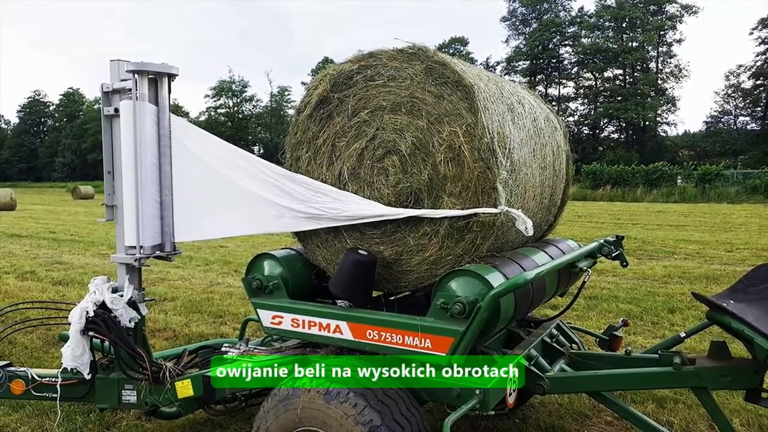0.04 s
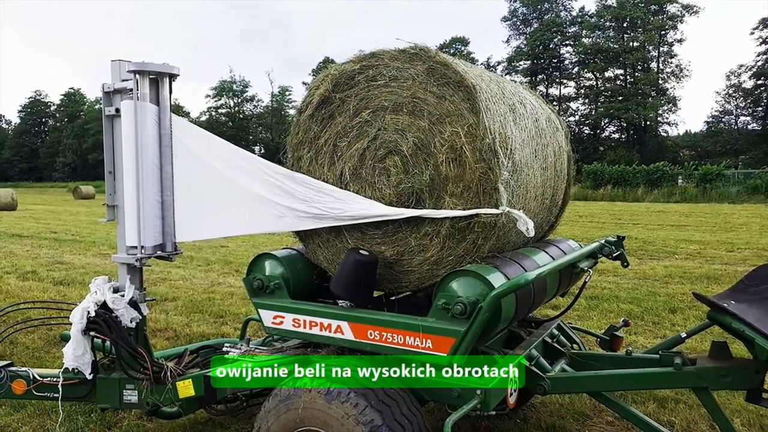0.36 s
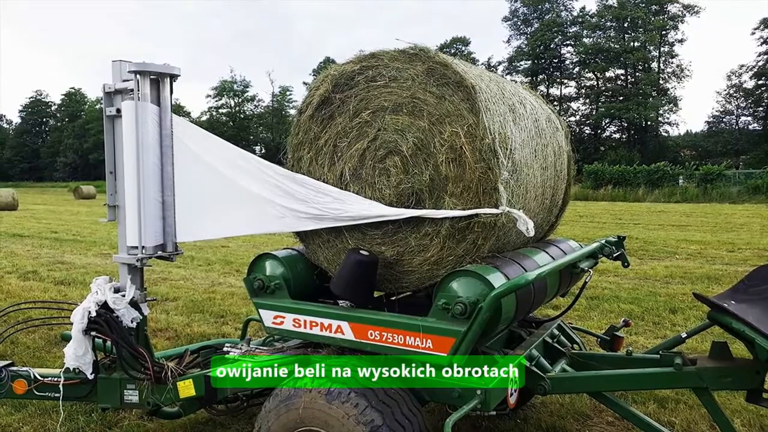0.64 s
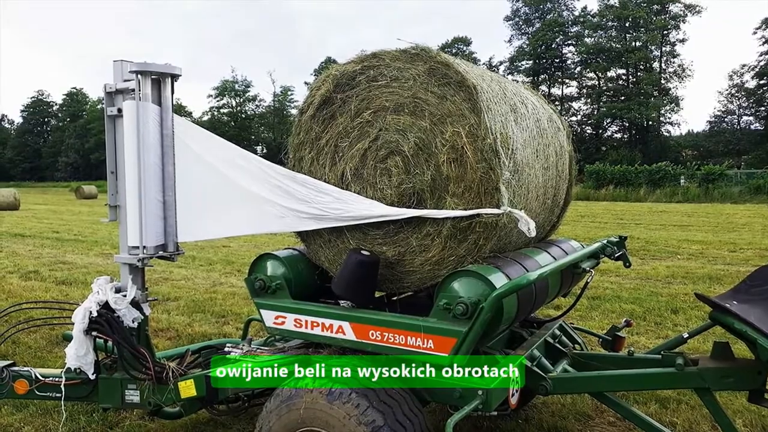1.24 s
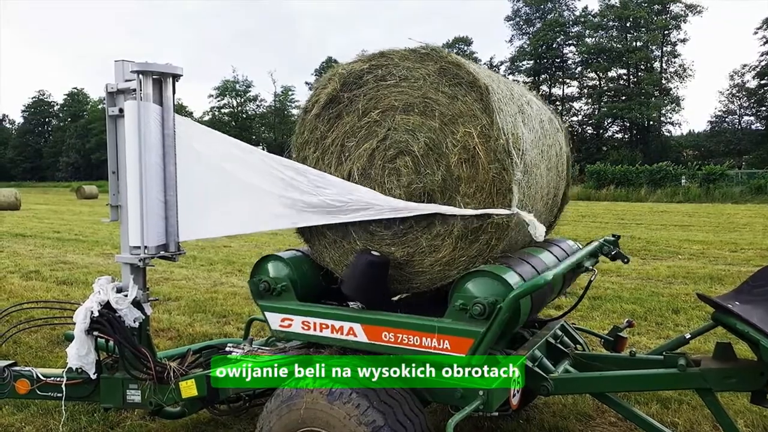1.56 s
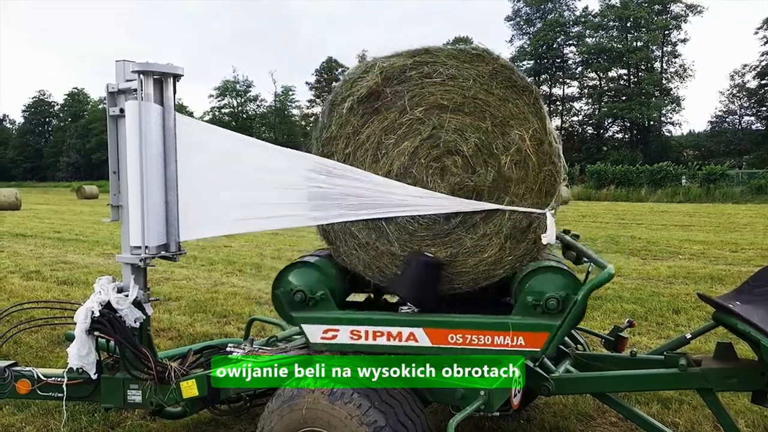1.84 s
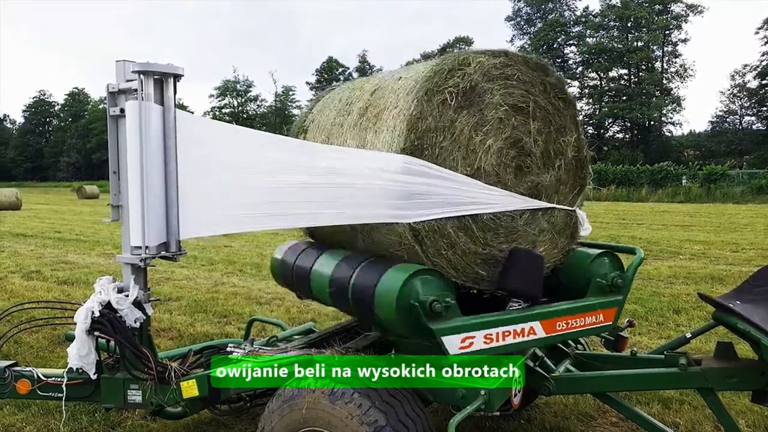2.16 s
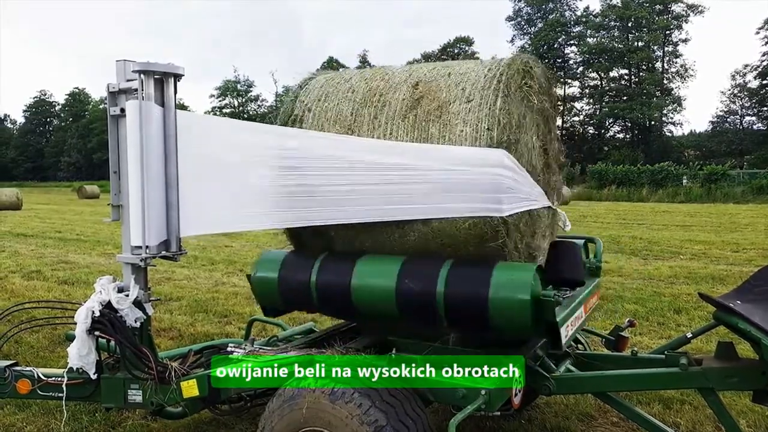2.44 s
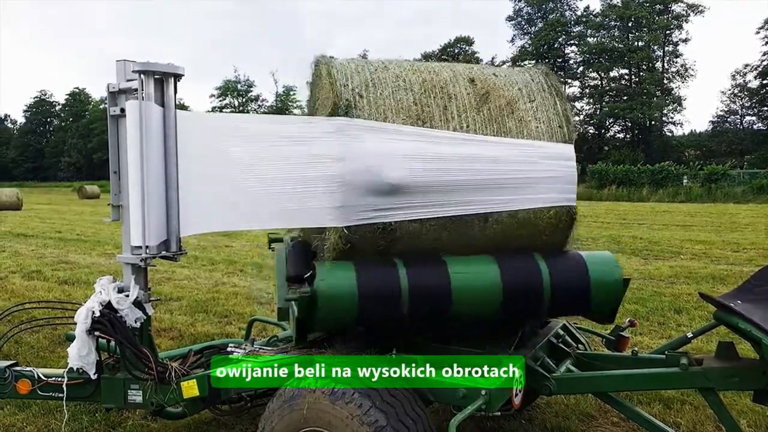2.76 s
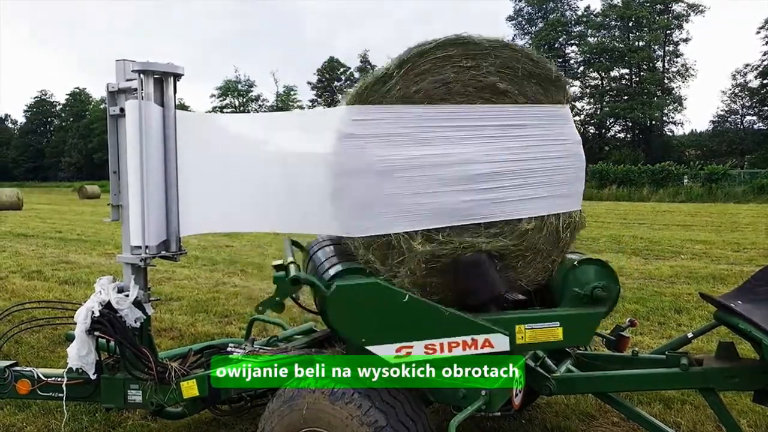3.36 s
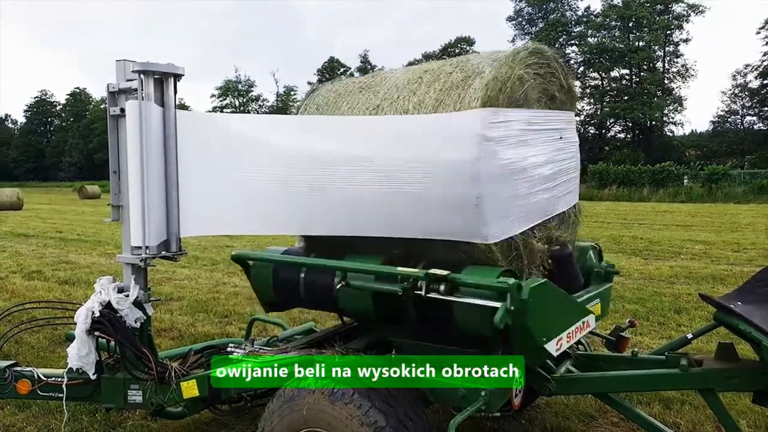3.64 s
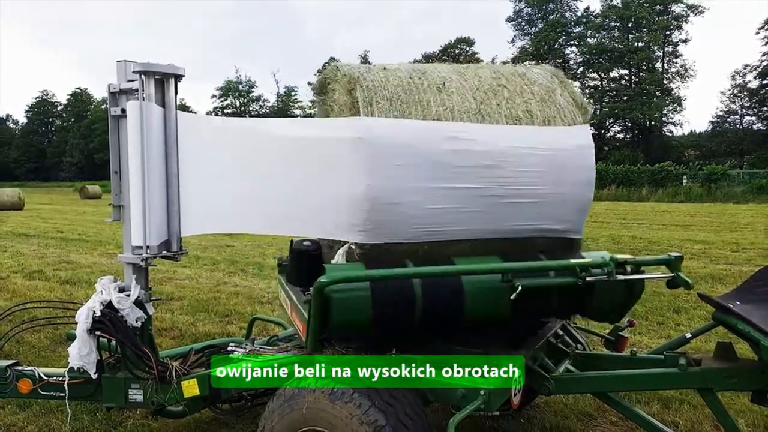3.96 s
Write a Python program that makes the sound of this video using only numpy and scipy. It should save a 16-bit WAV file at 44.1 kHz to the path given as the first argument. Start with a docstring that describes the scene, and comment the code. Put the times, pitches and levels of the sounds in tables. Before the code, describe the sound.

A diesel bale wrapper idles, clacks, then whirs as plastic film peels with a crackle.

```python
"""Open field: a tractor's four-cylinder diesel idles beside a bale wrapper, its frame knocking dully.
A hydraulic valve clacks open, oil hisses, and the engine sags under the load, then revs up.
The turntable rumbles and whirs, its steel singing as it rubs; the bale swings round with a swish.
Stretch film peels off its roll in tiny snaps: a crackling hiss with short, high zips."""
import sys
import numpy as np
from scipy.fft import rfft, irfft, next_fast_len
from scipy.io import wavfile
from scipy.ndimage import map_coordinates

SR = 44100
rng = np.random.default_rng(int(sys.argv[2]) if len(sys.argv) > 2 else 0)


def inscribe(sig):
    """Save sig as 16-bit PCM at rate SR to the path in sys.argv[1].

    A 1-D sig is mono; a 2-D sig holds one channel per row.
    Samples are clipped to [-1, 1] before scaling.
    """
    pcm = np.round(np.clip(np.atleast_2d(sig).T, -1, 1) * 32767)
    wavfile.write(sys.argv[1], SR, pcm.astype(np.int16))


N = 176400

# engine speed (time [s], firing rate [Hz])
FIRING_HZ = [(0, 30), (1.5, 30), (1.75, 27.7), (2.09, 28), (2.51, 31.3), (2.75, 34), (2.92, 37.7),
             (3.03, 39.5), (3.5, 40), (3.71, 41.1), (3.85, 42.7), (4, 46)]
# exhaust partials (multiple of the four-firing cycle, idle [dB], working [dB], unevenness [dB])
EXHAUST_ORDERS = [(4, -44.5, -32, 2), (5, -58, -54, -2), (7, -46, -40.5, 2.5), (8, -37, -33.5, 2.2),
                  (9, -48.5, -46, 1.5), (10, -46, -44.5, 0.5), (11, -45, -44, 1.5), (12, -38.5, -32.5, 1.4),
                  (13, -42, -42, 2), (16, -37.5, -42.5, 1.5), (20, -41.5, -48, 1), (23, -47.5, -43, 1),
                  (28, -50, -48.5, 2), (29, -49.5, -58, 1)]

# envelopes (time [s], level [dB])
EXHAUST_DB = [(0, 1.5), (1.0, 2.5), (1.35, -0.5), (1.8, 4), (2.5, 1.5), (2.75, 5.5), (2.92, 7), (3.1, 2),
              (3.45, 2), (3.7, -0.5), (4, -4.5)]
BLOCK_BOOM_DB = [(0, -41), (1.5, -38.5), (2.4, -38), (3.0, -36), (4, -39)]
DIESEL_KNOCK_DB = [(0, -45), (.25, -45), (.7, -47), (1.45, -46.5), (1.8, -45), (2.5, -45), (3.0, -42.5),
                   (4, -45)]
TABLE_RUMBLE_DB = [(0, -43), (1.55, -52), (1.8, -44), (2.4, -42.5), (2.85, -36), (3.2, -35.5), (3.62, -32),
                   (3.76, -33.5), (3.88, -31.5), (4, -31)]
CHASSIS_SHUDDER_DB = [(0, -42), (.3, -37), (.5, -41.5), (.8, -35.5), (1.3, -39.5), (1.55, -40), (1.8, -44),
                      (2.1, -43), (2.3, -42), (2.6, -35.5), (2.9, -39), (3.15, -41), (3.7, -38),
                      (3.88, -33), (4, -22)]
DRIVE_WHIR_DB = [(0, -100), (2.3, -65), (2.85, -46), (3.25, -47), (3.48, -50), (3.55, -44), (3.6, -41.5),
                 (3.65, -42), (3.72, -49), (4, -50)]
STEEL_RUB_DB = [(0, -120), (2.1, -85), (2.7, -70), (2.85, -56), (3.1, -57), (3.3, -60), (3.49, -55),
                (3.55, -44), (3.6, -48), (3.65, -41.5), (3.72, -59), (4, -59)]
FILM_PEEL_DB = [(0, -110), (1.7, -73), (2.1, -60), (2.2, -53), (2.35, -56), (2.47, -46.5), (2.6, -48),
                (2.85, -43.5), (3.25, -43.5), (3.6, -41.5), (3.77, -43.5), (4, -45)]
OIL_HISS_DB = [(0, -79), (.1, -71), (.13, -62), (.22, -63), (.33, -87), (1.55, -74), (1.59, -59.5),
               (1.8, -58.5), (2.0, -50), (2.2, -51), (2.45, -57.5), (2.8, -52.5), (4, -46.5)]

# spectra (frequency [Hz], left [dB], right [dB])
BLOCK_BOOM_EQ = [(20, -100, -122), (48.6, -80, -77), (118, -56, -51.5), (168, -57.5, -54), (221, -54, -54),
                 (390, -68.5, -63.5), (500, -62.5, -63.5), (608, -62, -58), (773, -73, -69),
                 (1620, -105, -105), (4000, -150, -150)]
DIESEL_KNOCK_EQ = [(99, -110, -110), (520, -75, -89.5), (970, -84, -74.5), (1110, -78.5, -74.5),
                   (1760, -82.5, -79), (2150, -93, -85), (3080, -98, -88.5), (4760, -102, -98),
                   (5300, -119, -107), (6700, -122, -106), (7800, -123, -119), (8950, -114, -112),
                   (9800, -117, -110), (12300, -127, -125), (14900, -141, -141)]
TABLE_RUMBLE_EQ = [(20, -77, -101), (48.8, -61, -68.5), (153, -63, -60.5), (208.5, -50.5, -49.5),
                   (350, -61.5, -60.5), (435, -57, -55.5), (650, -62, -59), (826, -71, -65.5),
                   (1480, -74.5, -71), (1740, -77, -77), (2600, -85, -72), (5030, -115, -115),
                   (10000, -140, -140)]
CHASSIS_SHUDDER_EQ = [(15, -23, -42), (30, -3, 1), (51, 6.5, -1), (78, -10, -10), (134, -6.5, -8),
                      (300, -49, -54), (1000, -91, -93)]
FILM_PEEL_EQ = [(300, -105, -105), (1340, -86, -70.5), (2500, -81.5, -82.5), (3380, -82, -75.5),
                (4300, -81.5, -72.5), (4800, -75.5, -84), (5400, -84, -80.5), (6870, -86.5, -80.5),
                (7520, -115, -75.5), (8200, -87.5, -99), (8570, -76, -77.5), (10400, -90.5, -84),
                (11400, -104, -84.5), (12200, -90, -83), (14500, -104, -85), (15700, -104, -81)]
FILM_TICK_EQ = [(1500, -30, -26), (4000, -12, 1), (7060, -8, -6), (10000, -5, 8), (13000, -9, -5),
                (15500, -18, -9)]
VALVE_CLACK_EQ = [(300, -90, -87), (790, -77, -72), (1070, -57.5, -60), (1480, -77, -63.5),
                  (2140, -72, -70.5), (3200, -88, -64.5), (3900, -81, -75), (5000, -98, -87),
                  (8060, -105, -94), (9700, -88, -80.5), (11900, -110, -102), (15000, -113, -108)]
FRAME_THUD_EQ = [(150, -34, -29), (407, -12, -11), (590, -0.5, 1), (790, -21, -14), (1500, -32, -30),
                 (4000, -55, -50), (9000, -84, -80)]
OIL_HISS_EQ = [(500, -120, -120), (1970, -104, -91.5), (3250, -100, -80), (4100, -102, -96.5),
               (6600, -107, -93.5), (8100, -104, -103), (9040, -101, -91.5), (10400, -102, -90.5),
               (13000, -108, -95.5), (15500, -124, -100)]

# resonances of the drive and film roll (centre [Hz], width [Hz], level [dB])
DRIVE_MODES = [(420, 120, -1.5), (1071, 73, 1.5), (1420, 100, -10), (1970, 100, -3.5), (2440, 55, -10),
               (3170, 130, -9)]
ROLL_MODES = [(3646, 30, 1), (4720, 260, 5), (5080, 160, -1), (7400, 110, -1), (8720, 130, -1),
              (12260, 70, 3), (12590, 150, -3), (13150, 200, -5), (13900, 80, -5)]
# valve body resonances (frequency [Hz], level [dB], t60 [s])
VALVE_MODES = [(893, -19, 0.42), (1066, 1.5, 0.15), (1194, -8.5, 0.43), (1940, -10, 0.095),
               (2455, -13, .12), (2910, -15.5, 0.34), (2810, -17, 0.33), (3171, -5.5, 0.15),
               (3655, -14, 0.12)]
# rubbing steel (frequency [Hz], level [dB])
STEEL_PARTIALS = [(1085, 3.5), (1373, -10), (1453, -6), (2008, -13), (2433, -5.5), (3160, -12)]

# valve blows (time [s], level [dB], noise t60 [s], ring offset [dB])
VALVE_CLACKS = [(1.4795, -27, .08, -1), (1.494, -34, .09, -2), (1.574, -38.5, .1, -12),
                (1.605, -36.5, .1, -12)]
# short impacts (time [s], level [dB], t60 [s])
FRAME_THUDS = [(.284, -30.5, 0.09), (.492, -33, .06), (.892, -32.5, 0.028), (1.007, -34, 0.14),
               (1.225, -33, 0.021)]
FILM_TICKS = [(1.994, -43, .02), (2.168, -39.5, 0.029)]
# film tearing free (time [s], level [dB])
FILM_ZIPS = [(2.1679, -40), (2.1916, -38), (2.2128, -39), (2.233, -42), (2.255, -43), (2.3121, -41),
             (2.371, -40), (2.4199, -43), (2.4378, -39), (2.4564, -32), (2.464, -35), (2.5147, -37),
             (2.554, -40), (2.6194, -38), (2.7022, -37), (2.715, -37), (2.741, -37), (2.749, -34),
             (2.773, -34), (2.78, -35), (3.2555, -31), (3.2764, -37), (3.3772, -40), (3.573, -33),
             (3.606, -36), (3.628, -36), (3.7823, -37), (3.8017, -39), (3.84, -36), (3.8601, -33),
             (3.8955, -31), (3.9195, -33)]
# swinging bale (time [s], centre [Hz], level [dB])
BALE_SWISH = [(2.1, 4500, -85), (2.2, 4150, -63), (2.33, 4100, -57), (2.47, 3850, -54.5), (2.56, 3450, -55),
              (2.68, 2700, -62), (2.8, 2200, -75), (2.9, 2200, -100)]
# faint squeaks (time [s], length [s], pitch [Hz], level [dB])
FAINT_SQUEAKS = [(.005, 0.039, 3340, -66), (0.045, 0.074, 2830, -58), (0.13, 0.052, 3060, -64),
                 (2.17, 0.077, 2500, -58)]
# likeness of left and right (frequency [Hz], coherence [0-1])
COHERENCE = [(200, 1), (400, 0.85), (600, 1), (900, 0.4), (1600, 0.82), (4000, .58), (9000, 0.33),
             (15000, 0)]

BASS_LEAD_MS, ENGINE_LEAD_MS, FILM_LEAD_MS = 0.085, 0.34, 0.15  # left ahead of right


def amp(db):
    """Decibels to gain."""
    return 10 ** (np.asarray(db) / 20)


def pan(left_db, right_db):
    """Stereo gain pair."""
    return amp([[left_db], [right_db]])


def unit(x):
    """Scale to rms 1."""
    return x / np.sqrt(np.mean(x ** 2) + 1e-30)


def along(table, hz, column=1):
    """Spectrum column, interpolated in log frequency."""
    rows = np.array(table, float)
    return np.interp(np.log(hz + 1), np.log(rows[:, 0] + 1), rows[:, column])


def curve(rows):
    """Breakpoints to one value per sample."""
    return np.interp(np.arange(N) / SR, *np.transpose(rows))


def wobble(rate_hz):
    """Smooth random curve, rate_hz knots a second."""
    return map_coordinates(rng.standard_normal(N // 8), [np.arange(N) * rate_hz / SR + 4], mode="mirror")


def filtered(x, response):
    """Apply a frequency response."""
    size = next_fast_len(N + 8192)
    return irfft(rfft(x, size) * response(np.fft.rfftfreq(size, 1 / SR)), size)[..., :N]


def noise(response, lead_ms, envelope=1):
    """Modulated, filtered stereo noise: rms 1, partly coherent, left leading."""
    def mid_side(hz):
        angle = np.arccos(np.clip(along(COHERENCE, hz), 0, 1)) / 2
        return np.array([np.cos(angle), np.sin(angle)])

    mid, side = filtered(envelope * rng.standard_normal((2, N)), mid_side)
    lead = lambda hz: np.exp(1j * np.pi * hz * lead_ms / 1000 * np.array([[1], [-1]]))
    return unit(filtered(np.array([mid + side, mid - side]), lambda hz: response(hz) * lead(hz)))


def colour(table, ripple_db=2, step_hz=64.86, corner_hz=270):
    """Stereo response of a spectrum, rippled above the bass by small steelwork resonances."""
    knots = rng.standard_normal((2, 1024))

    def response(hz):
        smooth_db = np.array([along(table, hz, column) for column in (1, 2)])
        ripple = np.array([map_coordinates(side, [hz / step_hz], mode="mirror") for side in knots])
        return amp(smooth_db + ripple_db * ripple * hz ** 2 / (hz ** 2 + corner_hz ** 2))
    return response


def resonances(modes):
    """Response of narrow peaks."""
    return lambda hz: sum(amp(db) / (1 + (2 * (hz - centre_hz) / width_hz) ** 2)
                          for centre_hz, width_hz, db in modes)


def strokes(beats, pattern_db, scatter_db, decay_beats, floor):
    """Envelope with one burst a beat, sized by a pattern and by chance."""
    index = beats.astype(int)
    level_db = np.array(pattern_db)[index % len(pattern_db)]
    size = amp(level_db + scatter_db * rng.standard_normal(2048)[index])
    return unit(floor + size * np.exp(-(beats % 1) / decay_beats))


def blows(events, spectrum, lead_ms, attack_s):
    """Heavily damped impacts: bursts of coloured noise."""
    envelope = np.zeros(N)
    for start_s, db, t60_s, *_ in events:
        age_s = np.maximum(np.arange(N) / SR - start_s, 0)
        envelope += amp(db - 60 * age_s / t60_s) * (1 - np.exp(-age_s / attack_s))
    return envelope * noise(colour(spectrum), lead_ms)


def engine(idle_hz=30, work_hz=40, smear_cycles=2 / 3):
    """Exhaust partials, block boom and diesel knock, all locked to the crankshaft."""
    firing_hz = curve(FIRING_HZ)
    firings = np.cumsum(firing_hz) / SR
    work = np.clip((firing_hz - idle_hz) / (work_hz - idle_hz), 0, 1)
    exhaust = np.zeros(N)
    for order, idle_db, work_db, uneven_db in EXHAUST_ORDERS:
        db = idle_db + (work_db - idle_db) * work + uneven_db * wobble(5)
        cycles = order * firings / 4 + smear_cycles * rng.random()  # the pipe shifts each partial
        exhaust += amp(db) * np.sin(2 * np.pi * cycles + 0.26 * wobble(8.8))
    pulses = strokes(2 * firings, [1, -2], scatter_db=-2.5, decay_beats=1, floor=0.74)
    boom = amp(curve(BLOCK_BOOM_DB)) * noise(colour(BLOCK_BOOM_EQ), BASS_LEAD_MS, pulses)
    raps = strokes(2 * firings, [2.5, -1, 1, -2, 2, -1, 0, -2], scatter_db=1.5, decay_beats=.5, floor=.45)
    knock = amp(curve(DIESEL_KNOCK_DB)) * noise(colour(DIESEL_KNOCK_EQ), ENGINE_LEAD_MS, raps)
    return amp(curve(EXHAUST_DB)) * exhaust + boom + knock


def turntable(flutter_db=2.3):
    """The loaded table rumbles and shakes the chassis; its drive whirs in narrow resonances."""
    rumble = noise(colour(TABLE_RUMBLE_EQ), BASS_LEAD_MS)
    rumble *= amp(curve(TABLE_RUMBLE_DB) + 1.57 * wobble(70))
    shudder = noise(colour(CHASSIS_SHUDDER_EQ), BASS_LEAD_MS) * amp(curve(CHASSIS_SHUDDER_DB))
    whir = noise(resonances(DRIVE_MODES), BASS_LEAD_MS)
    whir *= amp(curve(DRIVE_WHIR_DB) + flutter_db * wobble(35))
    return rumble + shudder + whir * pan(-2.5, 2.5)


def valve(body_db=-6):
    """The valve slams over, bounces and settles; each blow rings its body."""
    ring, t = np.zeros(N), np.arange(SR // 4) / SR
    for start_s, db, _, ring_db in VALVE_CLACKS:
        for hz, mode_db, t60_s in VALVE_MODES:
            fade = amp(db + ring_db + body_db + mode_db - 60 * t / t60_s)
            phase = 2 * np.pi * hz * t + 0.65 * wobble(253)[:len(t)]
            ring[round(start_s * SR):][:len(t)] += fade * np.sin(phase)
    return ring * pan(-3, 3) + blows(VALVE_CLACKS, VALVE_CLACK_EQ, ENGINE_LEAD_MS, attack_s=0.001)


def film_peel(snap_db=2.6, ring_db=-9.5):
    """Tacky film lets go in countless tiny snaps that ring the roll and rollers."""
    snaps = amp(snap_db * wobble(1500) + 0.43 * wobble(76))
    ring = amp(ring_db) * noise(resonances(ROLL_MODES), FILM_LEAD_MS, snaps) * pan(-4, 3)
    crackle = noise(colour(FILM_PEEL_EQ), FILM_LEAD_MS, snaps)
    return (crackle + ring) * amp(curve(FILM_PEEL_DB))


def zip_chirp(t, detune_hz=0, base_hz=12250, drop_hz=1500, fall_s=.002, rough_hz=2300, settle_s=.008):
    """One patch of film tears free: a rough chirp settling on a high note."""
    glide_hz = drop_hz * np.exp(-t / fall_s)
    jitter_hz = rough_hz * np.exp(-t / settle_s) * rng.standard_normal(len(t))
    hz = base_hz + detune_hz + glide_hz + jitter_hz
    attack = 1 - np.exp(-t / 0.00028)
    return attack * np.sin(2 * np.pi * np.cumsum(hz) / SR)


def film_zips(gain_db=-7, t60_s=.025, ring_db=-12, ring_t60_s=.13):
    """Large patches tear free: single zips with a ringing tail."""
    out, t = np.zeros(N), np.arange(SR // 12) / SR
    fade = amp(-60 * t / t60_s) + amp(ring_db - 60 * t / ring_t60_s)
    for start_s, db in FILM_ZIPS:
        start = round(start_s * SR)
        out[start:start + len(t)] += (amp(db + gain_db) * fade * zip_chirp(t))[:N - start]
    return out * pan(-4, 5)


def film_sizzle(rate_hz=170, t60_s=.009, gain_db=-2, spread_db=16, spread_hz=1500):
    """Small patches tear free at random; their level follows the peeling."""
    out, t = np.zeros(N + SR), np.arange(t60_s * SR) / SR
    peel_db = curve(FILM_PEEL_DB)
    for when, size, pitch in rng.random((int(rate_hz * N / SR), 3)):
        start = int(when * N)
        db = peel_db[start] + gain_db + spread_db * (size - .5)
        out[start:][:len(t)] += amp(db - 60 * t / t60_s) * zip_chirp(t, spread_hz * (pitch - .5))
    return out[:N] * pan(-4, 5)


def film_ticks():
    """Film pulls taut with sharp ticks."""
    return blows(FILM_TICKS, FILM_TICK_EQ, FILM_LEAD_MS, attack_s=0.0004)


def frame_thuds():
    """The shaking frame knocks dully."""
    return blows(FRAME_THUDS, FRAME_THUD_EQ, BASS_LEAD_MS, attack_s=0.0014)


def steel_rub(waver=.004, flutter_db=2):
    """Rubbing turntable steel sings in wavering partials, each swelling on its own."""
    song = np.zeros(N)
    for centre_hz, db in STEEL_PARTIALS:
        gain = amp(db + flutter_db * wobble(16))
        hz = centre_hz * (1 + waver * (wobble(25) + wobble(400)))
        song += gain * np.sin(2 * np.pi * np.cumsum(hz) / SR)
    return amp(curve(STEEL_RUB_DB)) * song * pan(-2.5, 2.5)


def oil_hiss(song_start_s=1.62, song_length_s=.15, song_hz=10170, width_hz=1100, song_db=-58):
    """Oil hisses through the valve; a thin band sings while the gap is still narrow."""
    progress = np.clip((np.arange(N) / SR - song_start_s) / song_length_s, 0, 1)
    swell = np.abs(np.sin(np.pi * progress)) ** .5
    song = noise(resonances([(song_hz, width_hz, 0)]), ENGINE_LEAD_MS) * pan(-5, 3)
    hiss = noise(colour(OIL_HISS_EQ), ENGINE_LEAD_MS) * amp(curve(OIL_HISS_DB) + 0.94 * wobble(60))
    return amp(song_db) * swell * song + hiss


def bale_swish(half_width_hz=480):
    """A hollow band of hiss slides down as the bale swings round."""
    rows = np.array(BALE_SWISH)
    centre_hz, db = curve(rows[:, [0, 1]]), curve(rows[:, [0, 2]])
    band = noise(lambda hz: np.exp(-(hz / half_width_hz) ** 2), FILM_LEAD_MS)
    carrier = np.cos(2 * np.pi * np.cumsum(centre_hz) / SR)
    return amp(db) * unit(band * carrier) * pan(-2.5, 2.5)


def squeaks(sag=0.0191, waver=.022, harmonics_db=(5.5, -3.5, -17, -15)):
    """Faint, thin squeaks, sagging slightly in pitch."""
    out = np.zeros(N)
    for start_s, length_s, pitch_hz, db in FAINT_SQUEAKS:
        progress = np.clip((np.arange(N) / SR - start_s) / length_s, 0, 1)
        hz = pitch_hz * (1 - sag * (progress - .5) + waver * wobble(700))
        phase = 2 * np.pi * np.cumsum(hz) / SR
        tone = sum(gain * np.sin(k * phase) for k, gain in enumerate(amp(harmonics_db), 1))
        out += amp(db) * np.abs(np.sin(np.pi * progress)) ** .5 * tone
    return out * pan(-3, 2)


def scene():
    """Tractor and wrapper in the open; no reflections."""
    impacts = frame_thuds() + film_ticks()
    machine = engine() + valve() + turntable() + steel_rub() + oil_hiss()
    wrapping = film_peel() + bale_swish() + film_zips() + film_sizzle()
    return machine + wrapping + impacts + squeaks()


def record(dry):
    """Brick-wall low-pass."""
    cutoff_hz = 15820
    return filtered(dry, lambda hz: hz < cutoff_hz)


dry = scene()
out = record(dry)
inscribe(out)
```